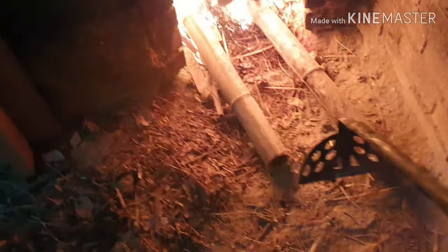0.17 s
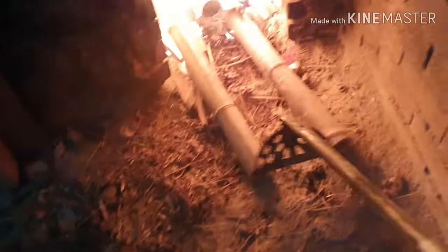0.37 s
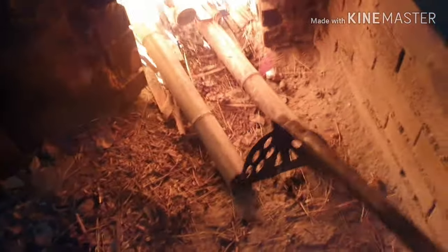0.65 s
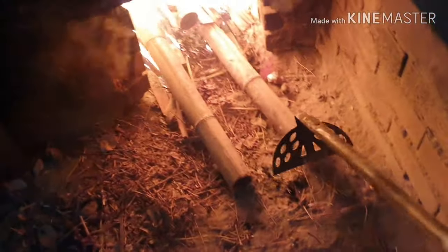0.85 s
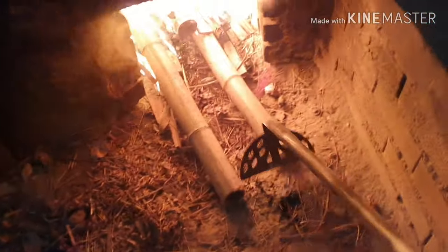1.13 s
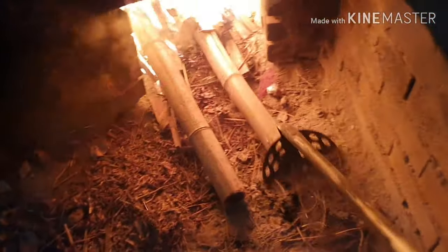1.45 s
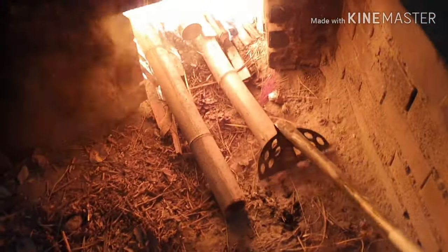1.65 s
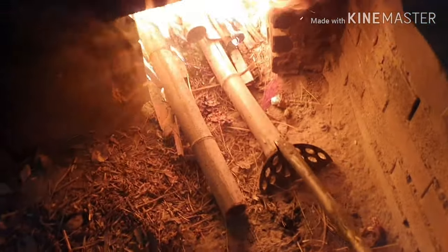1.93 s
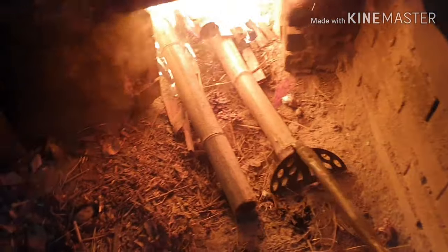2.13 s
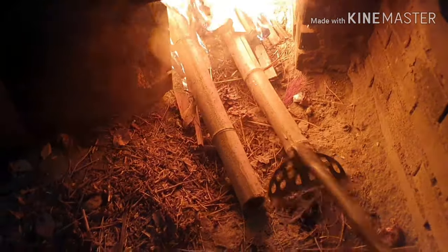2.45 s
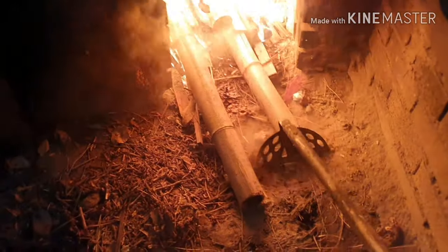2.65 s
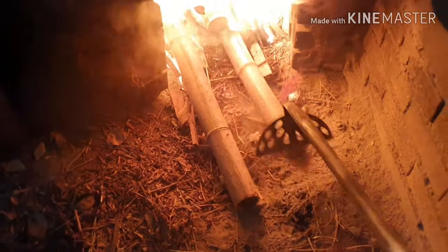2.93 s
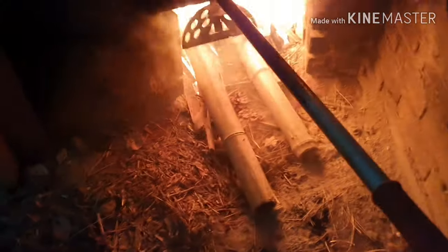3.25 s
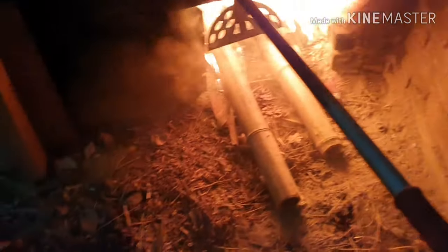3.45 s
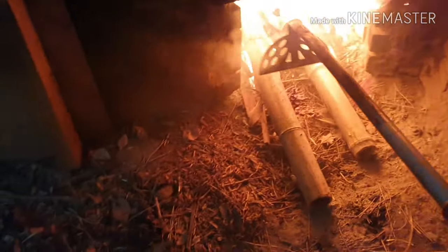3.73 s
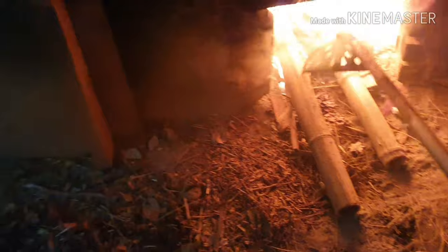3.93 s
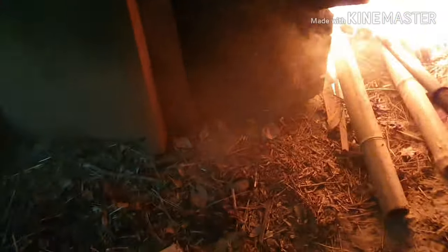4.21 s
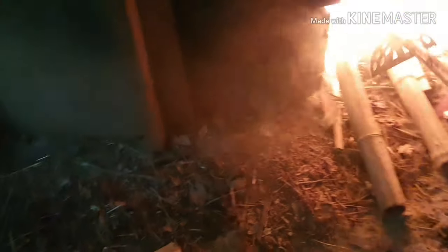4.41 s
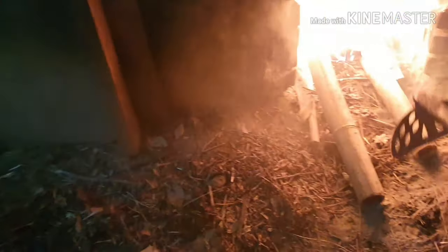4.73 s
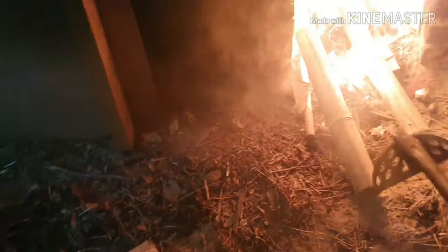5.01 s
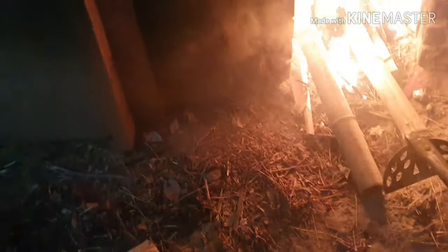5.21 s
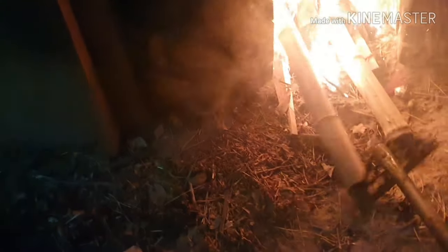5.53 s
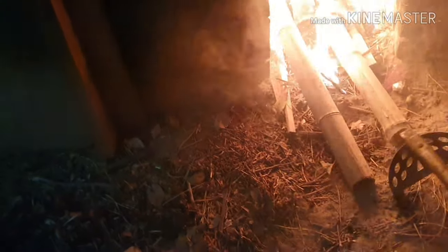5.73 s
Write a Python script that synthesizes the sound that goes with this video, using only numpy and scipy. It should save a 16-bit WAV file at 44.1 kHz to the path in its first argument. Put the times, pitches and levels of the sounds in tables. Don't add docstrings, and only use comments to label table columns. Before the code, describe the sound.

Close to a brick firebox under a roof, a metal rake strikes and shoves hollow bamboo poles in uneven bursts. Woody thuds and hard clacks come with brief bright iron ringing and a short echo. Ash and dry husks rustle and drag after the blows. Between them, faint ticks, light scraping, soft flame rumble and thin steam hiss remain. The loudest clatter comes near the end.

```python
import sys
import numpy as np
from scipy import signal
from scipy.io import wavfile
from scipy.ndimage import uniform_filter1d

SR = 44100
rng = np.random.default_rng(int(sys.argv[2]) if len(sys.argv) > 2 else 0)


def boost(x):
    u = np.asarray(x, float) / 20
    return 10 ** u


def master(y):
    cut = np.clip(np.atleast_2d(y).T, -1, 1)
    pcm = np.round(cut * 32767)
    wavfile.write(sys.argv[1], SR, pcm.astype(np.int16))


N = 258426


def in_time(rows):
    s, *columns = np.transpose(rows)
    return np.array([np.interp(np.arange(N) / SR, s, c) for c in columns])


def at_hz(points, hz):
    points_hz, values = np.transpose(points)
    return np.interp(np.log(hz), np.log(points_hz), values)


def rms_one(x):
    return x / np.sqrt(np.mean(x ** 2) + 1e-20)


def bandpass(x, low_hz, high_hz):
    return signal.sosfilt(signal.butter(2, [low_hz, high_hz], "band", fs=SR, output="sos"), x)


def drift(rate_hz):
    r = np.exp(-2 * np.pi * rate_hz * 40 / SR)
    slow = signal.lfilter([1], [1, -2 * r, r * r], rng.standard_normal(N // 40 + 2002))[2000:]
    return np.interp(np.arange(N) / 40, np.arange(len(slow)), rms_one(slow))


def decay(t, t60):
    return boost(-60 * t / np.maximum(t60, .002))


def bands(white):
    # pitch_hz, correlation
    likeness = [(30, 0.99), (70, 0.99), (180, 0.95), (400, 0.83), (800, 0.15), (1500, -0.1),
                (3000, 0.000095), (15000, -0.092)]
    edges_hz = 22 * 2 ** np.arange(0, 9.8, .5)
    for k, (low_hz, high_hz) in enumerate(zip(edges_hz, edges_hz[1:])):
        mid, side = bandpass(white[k % 2], low_hz, high_hz)
        hz = np.sqrt(low_hz * high_hz)
        alike = np.clip(at_hz(likeness, hz), -1, 1)
        yield hz, np.sqrt(1 + alike) * mid + np.sqrt(1 - alike) * side * [[1], [-1]]


def add(out, s, sound, pan_db):
    i = round(s * SR)
    panned = sound * boost(np.array([[.5], [-.5]]) * pan_db)
    out[:, i:i + sound.shape[-1]] += panned[:, :N - i]


def thuds():
    # start_s, peak_db, pitch_hz, left_minus_right_db
    knocked = [(0.271, -7.5, 523, 2), (0.268, -6.5, 689, 0), (0.324, -15, 740, 7), (0.9, -10.5, 733, 2),
               (0.954, -15.5, 782, 4), (1.004, -23.5, 840, 0), (1.067, -18.5, 497, 1),
               (1.442, -29.5, 794, 25), (1.482, -15, 677, 5), (1.524, -26, 726, 21), (5.534, -1.5, 427, 4),
               (1.812, -35.5, 608, 6), (2.492, -29, 530, 2.5), (2.51, -25.5, 750, 9), (2.537, -10, 658, -5),
               (3.562, -37, 524, -3), (2.988, -10.5, 685, 1), (3.059, -25, 630, 4), (3.265, -30, 656, -2),
               (3.926, -23, 459, -4), (3.966, -27, 430, 3), (4.038, -14, 635, -4), (4.076, -9, 790, -1),
               (4.482, -25, 513, -5), (4.495, -18, 567, -2), (5.552, -15.5, 564, 0), (5.065, -7.5, 460, 3),
               (5.075, -19, 686, 3), (5.655, -19.5, 487, -4), (5.716, -24, 470, 1)]
    # start_s, peak_db, pitch_hz, left_minus_right_db
    dropped = [(0.0055, -35, 54.7, -35), (1.783, -34.5, 438, 3), (4.827, -31.5, 578, 1),
               (5.577, -21, 408, -1), (0.9, -11, 280, 0), (2.515, -20.5, 333, 4), (2.534, -12.5, 261, -3),
               (2.988, -18, 168, 0), (3.019, -12.5, 275, -2), (3.267, -24, 282, 0), (4.039, -17, 200, -1),
               (4.255, -23, 176, 0), (4.288, -23, 292, 18), (4.331, -28, 407, 1), (4.528, -22, 273, -1),
               (4.84, -25, 153, 0), (4.842, -29, 206, 2), (5.079, -4.5, 456.6, -2), (5.501, -20.5, 292, 2),
               (5.539, -11, 346, 0), (5.745, -22, 273, 2), (3.334, -30.5, 149, 2), (4.775, -32, 170, 0),
               (3.72, -33, 180, 0)]
    ring_s, ring_turns = 0.013, 5.58
    drop_rings = 0.82
    out, t = np.zeros((2, N)), np.arange(SR // 5) / SR
    rows = [(*row, 1) for row in knocked] + [(*row, drop_rings) for row in dropped]
    for s, peak_db, hz, pan_db, rings in rows:
        chance = rng.random(3)
        pitches = hz * np.array([[1], [1.055 + 0.2 * chance[0]], [0.618 + 0.15 * chance[1]]])
        lag_s = np.array([[[.0002]], [[0]]]) * (2 * chance[2] - .6)
        modes = np.sin(2 * np.pi * pitches * (t - lag_s)) * boost(np.array([[0], [-8], [-11]]))
        swell = (1 - decay(t, 18 / hz)) ** 2
        fall = decay(t, rings * (ring_s + ring_turns / hz))
        add(out, s - .002, boost(peak_db + 15.0) * modes.sum(1) * swell * fall, pan_db)
    return out


def snap(t, t60, low_hz, high_hz=20000):
    shared, *own = rng.standard_normal((3, len(t)))
    return bandpass(0.57 * shared + np.array(own), low_hz, high_hz) * decay(t, t60)


def click(t, t60, low_hz, high_hz):
    return bandpass((t == 0) * np.sqrt(t60 * SR / 20), low_hz, high_hz)


def clacks():
    # start_s, peak_db, wall_pitch_hz, snap_above_peak_db, left_minus_right_db
    hard = [(0.2903, -12, 1135, -8, -7), (0.3297, -10, 1170, -7.5, -2), (0.9008, -3.5, 1237, -13, -9.5),
            (0.931, -11, 1490, -29, 0), (0.9545, -15.5, 930, -11, 2), (1.4423, -9.5, 1542, -9, 1),
            (1.4555, -11.5, 3250, 2.5, -6), (1.483, -7.5, 1093, -32, 1), (1.525, -15, 1035, -10, 4),
            (2.4895, -18, 1430, -3.5, 0), (2.5138, -4.5, 1435, -9.5, -0.5), (2.521, -16.5, 1940, 2, 3),
            (2.5334, -7.5, 1094, -8.5, 0), (2.9884, -3.5, 1445, -10.5, -4), (3.0193, -9.5, 1050, -6.5, -5),
            (3.0656, -33.5, 994, 8, -13), (3.265, -22.5, 1094, -4.5, -2), (4.0392, -11.5, 2750, 2, -9.5),
            (4.0757, -17, 940, -16, -4), (5.065, -5, 1309, -7.5, -4), (5.513, -22, 2140, 1, -6),
            (5.531, -13.5, 1364, -23, 14.5), (5.5485, -31, 1240, 20, -5), (5.559, -19, 2240, 4.5, -7),
            (0.311, -14.5, 1220, -25, 2), (0.3818, -34, 2960, 5.5, 0), (1.448, -12.5, 2200, -6, -9),
            (1.971, -45.5, 2300, 4.5, -4), (4.481, -41.5, 1500, -27, -17), (4.613, -36.5, 1700, -14, 1),
            (4.795, -44, 1880, -9, 1), (4.8263, -31.5, 1006, -14, -1), (5.5038, -23, 1990, -6, 1),
            (5.5327, -12, 1480, -5, -3), (3.9262, -37.5, 900, -12, -2), (0.903, -15, 1570, -17, 6),
            (5.068, -12.5, 1500, -32, 8), (3.0554, -21, 1900, -5, 1), (3.1, -34, 3000, -11, -3)]
    # start_s, peak_db, wall_pitch_hz, left_minus_right_db
    dull = [(0.2683, -6.5, 1180, 1), (0.3832, -29.5, 1720, -17), (1.253, -39, 2560, 7),
            (1.785, -35.5, 960, 2), (1.817, -33.5, 2070, -7), (1.971, -43, 1270, -1),
            (2.3008, -59, 1890, 3), (2.5687, -19, 890, 19), (3.099, -25, 1900, 4), (3.968, -35, 1010, 6),
            (4.0364, -17, 3440, -5), (4.494, -24, 1620, -2), (3.2645, -25.5, 2130, -11),
            (3.265, -31, 3550, -11), (0.269, -19, 2800, -3), (1.445, -15, 2700, 0), (1.457, -16, 4220, 0),
            (1.459, -17, 2040, 0), (1.477, -21, 3520, 0), (5.532, -18, 3470, 0), (0.3, -24, 2300, 0),
            (0.345, -18, 1700, 0), (0.922, -17, 2300, 0), (0.956, -19.5, 1880, 3), (0.956, -24, 3500, 0),
            (4.83, -32, 1140, 0), (4.041, -17, 2200, 5), (4.041, -15, 1050, 0), (0.902, -21, 3980, 0)]
    tap_snap_db, top_end_db = -28, -9
    notes, bursts, blows = np.zeros((3, 2, N))
    t = np.arange(SR // 10) / SR
    swell = (1 - decay(t, .012)) ** 2
    rows = [*hard, *[(s, peak_db, hz, tap_snap_db, pan_db) for s, peak_db, hz, pan_db in dull]]
    for s, peak_db, hz, hard_db, pan_db in rows:
        snap_db = peak_db + hard_db
        note = np.sin(2 * np.pi * hz * (t - np.array([[.0002], [0]]))) * decay(t, 0.023)
        # level_db, t60_s, low_hz, high_hz
        parts = [(peak_db + 3.5, 0.031, 0.52 * hz, min(1.89 * hz, 4000)),
                 (snap_db + 5.5, 0.021, 3220, 7300),
                 (snap_db + top_end_db + 1.0, 0.03, 9050, 20000)]
        burst = sum(boost(db) * snap(t, *part) for db, *part in parts)
        blow = sum(boost(db) * click(t, *part) for db, *part in parts)
        add(notes, s - .001, boost(peak_db + 4.5) * swell * note, pan_db)
        add(bursts, s - .001, (1 - decay(t, 0.014)) * burst, pan_db)
        add(blows, s, blow, 0)
    return notes, bursts, blows


def rake():
    # start_s, peak_db, mode_favoured_by_the_place_of_the_blow_hz
    strikes = [(1.454, -7.5, 9781), (1.497, -24, 8225), (1.813, -29, 6100), (2.513, -11, 12780),
               (2.989, -17, 10620), (3.021, -16, 10620), (3.8, -38, 9781), (2.493, -12, 11580),
               (5.517, -6.5, 11580), (5.548, -6, 4667), (1.455, -11, 3217), (1.456, -13, 6100),
               (5.53, -15, 7111), (1.545, -25, 10620), (1.442, -8.5, 12000), (1.52, -14, 6100),
               (1.541, -20, 8506), (5.52, -11, 14110), (5.55, -14, 12780), (5.598, -16, 8506),
               (1.765, -30, 8225), (1.766, -31, 7111), (2, -32, 11580), (1.814, -27, 12780),
               (3.06, -24, 8506), (5.549, -14, 14990), (2.118, -46, 10620)]
    # pitch_hz, level_db, t60_s
    iron = [(3217, -20, .1), (4667, -26, .1), (6100, -25, .15), (7111, -26, .15), (8225, -25, .25),
            (8506, -29, .35), (9781, -21, .13), (10620, -27, .28), (11220, -23, .15), (11580, -21, .09),
            (12780, -24, .1), (13800, -26, .12), (14110, -25, .15), (14990, -25, .15)]
    rattle_db, grain_s = 6.5, 0.0019
    steady_t60_s = 0.17
    out, t = np.zeros((2, N)), np.arange(SR // 7) / SR
    choke = np.sqrt(np.hanning(2 * len(t))[len(t):])
    hz, level_db, t60 = np.transpose(iron)[:, :, None]
    rattle_swing_db = rattle_db * np.minimum(steady_t60_s / t60, 1) ** 2
    for s, peak_db, favoured_hz in strikes:
        strength_db = rng.normal(-15, 3, hz.shape)
        strength_db[np.argmin(abs(hz - favoured_hz))] = 4
        phase = rng.uniform(0, 2 * np.pi, (2, *hz.shape))
        chatter = uniform_filter1d(rng.standard_normal((len(hz), len(t))), size=round(grain_s * SR))
        rattle = rattle_swing_db * np.tanh(rms_one(chatter)) * decay(t, 1.5)
        gain = boost(level_db + strength_db + rattle) * decay(t, t60)
        modes = gain * np.sin(2 * np.pi * hz * t + phase)
        add(out, s, boost(peak_db) * modes.sum(1) * choke * (1 - decay(t, 0.0016)), 0)
    return out


def shed(sources):
    # pitch_hz, t60_s
    roof_t60 = [(100, 0.22), (300, 0.22), (700, 0.32), (1500, 0.41), (4000, 0.39), (9000, 0.11),
                (16000, 0.18)]
    t, out = np.arange(SR * 3 // 5) / SR, 0
    for source in sources:
        white = rng.standard_normal((2, 2, len(t)))
        echoes = sum(band * decay(t, at_hz(roof_t60, hz)) for hz, band in bands(white))
        chance = rng.exponential(1, len(t) // 64 + 1).clip(0, 2)
        lumps = boost(2.5 * chance.repeat(64)[:len(t)])
        echoes = rms_one(lumps * echoes * (1 - decay(t, 0.016))) / np.sqrt(len(t))
        out = out + signal.fftconvolve(source.mean(0)[None], echoes, axes=1)[:, :N]
    return out


def litter():
    # start_s, length_s, dry_rustle_db, heavy_drag_db
    slides = [
        (0.281, 0.33, -36.5, -24),
        (0.915, 0.34, -34, -23),
        (1.262, 0.22, -24, -46),
        (1.447, 0.3, -22.5, -20),
        (2.499, 0.32, -34, -29.5),
        (2.997, 0.24, -43, -25.5),
        (3.266, 0.16, -69, -42),
        (4.039, 0.32, -50, -18.5),
        (5.07, 0.22, -66, -28.5),
        (5.585, 0.35, -51, -33.5),
    ]
    # start_s, length_s, dry_rustle_db, heavy_drag_db
    scrapes = [
        (1.708, 0.31, -51, -57),
        (1.934, 0.3, -50, -92),
        (3.557, 0.15, -32, -38),
        (3.912, 0.17, -58, -41),
        (4.232, 0.17, -49, -43),
        (4.448, 0.33, -49, -44),
        (5.498, 0.12, -18.5, -20),
    ]
    t, out = np.arange(N) / SR, 0
    for s, length, *level_db in slides:
        shape_db = np.interp(t - s, [0, 0.039, length / 2, length], [-1, 0, -16, -56], -120, -120)
        out = out + np.outer(boost(level_db), boost(shape_db))
    for s, length, *level_db in scrapes:
        shape_db = np.interp((t - s) / length, [0, 0.24, 0.58, 1], [-22.5, 0, -3, -22.5], -120, -120)
        out = out + np.outer(boost(level_db), boost(shape_db))
    return out


def plate(x):
    share = 0.74
    t, turn = np.arange(SR // 20) / SR, 2.46 * drift(3.8)
    bodies = rng.standard_normal((2, 1, len(t))) * decay(t, 0.033)
    one, other = [signal.oaconvolve(x, body / np.linalg.norm(body), axes=1)[:, :N] for body in bodies]
    return np.sqrt(1 - share) * x + np.sqrt(share) * (np.cos(turn) * one + np.sin(turn) * other)


def sliding(air):
    # pitch_hz, density_db
    rustle_spectrum = [(600, -60), (1500, -10), (3000, 6), (5000, 1), (8000, -0.5), (12000, 5), (16000, -4)]
    drag_spectrum = [(45, -29), (130, -12), (300, -8.5), (650, -4), (1200, -8), (2500, -12.5),
                     (5000, -26.5)]
    rustle_gain, drag_gain = uniform_filter1d(litter(), size=400)
    grain = boost(0.14 * rng.exponential(1, N // 32 + 1).repeat(32)[:N] + 2.0 * drift(57))
    rustle, drag = np.zeros((2, 2, N))
    for hz, band, own in air:
        rustle += band * boost(at_hz(rustle_spectrum, hz) + 0.44 * own)
        drag += band * boost(at_hz(drag_spectrum, hz) + 2.0 * own)
    rustle = plate(boost(-7.0) * rustle_gain * rms_one(grain * rustle))
    return rustle + boost(-4.5) * drag_gain * rms_one(grain * drag)


def whistles():
    # start_s, end_s,
    # pitch_hz, width_hz, level_db
    hisses = [
        (1.82, 2.1, 14300, 1100, -56),
        (2.09, 2.26, 2700, 14, -59),
        (1.13, 1.22, 1270, 70, -59),
        (3.72, 3.84, 1240, 60, -61),
        (4.5, 4.66, 1680, 350, -46),
        (4.51, 4.64, 2850, 260, -52),
        (3.58, 3.7, 1500, 900, -47),
        (4.5, 4.85, 620, 300, -44),
              (1.254, 1.41, 10700, 7100, -46), (2.097, 2.2, 7500, 7000, -61),
             (2.214, 2.27, 4200, 1000, -57.5), (2.313, 2.37, 4700, 2400, -58.5),
             (4.487, 4.7, 13000, 6500, -55), (4.5, 4.68, 4300, 2100, -48.5),
             (5.513, 5.55, 11600, 5500, -27), (5.553, 5.58, 10000, 3000, -25),
             (5.545, 5.6, 4500, 1200, -32), (2.49, 2.51, 12400, 4200, -37), (1.45, 1.5, 3800, 2400, -33),
             (1.5, 1.6, 9400, 6000, -42), (3.585, 3.74, 758, 64, -45.5), (3.558, 3.68, 515, 200, -43.5),
             (3.93, 4.03, 490, 230, -41), (0.64, 0.78, 11400, 8700, -67.5), (1.8, 2.08, 11000, 6700, -59.5),
             (5.075, 5.22, 12000, 7000, -57), (3.1, 3.26, 8700, 6600, -60), (4.34, 4.49, 10000, 9000, -64),
             (5.6, 5.8, 10000, 8000, -57), (4.83, 4.9, 330, 260, -43.5), (3.7, 3.92, 2300, 1600, -60),
             (0.905, 1.06, 760, 170, -29), (5.38, 5.5, 12000, 7000, -62), (1.26, 1.4, 3700, 2600, -42),
             (1.085, 1.145, 480, 130, -38), (2.36, 2.43, 4400, 2000, -61), (3.575, 3.685, 9000, 10000, -48),
             (5.69, 5.78, 480, 160, -38), (4.09, 4.2, 760, 160, -32)]
    out, slips = np.zeros((2, N)), boost(0.83 * drift(21))
    for start, end, hz, width_hz, level_db in hisses:
        noise = rng.standard_normal((2, round((end - start + .04) * SR)))
        narrow = bandpass(noise, hz - width_hz / 2, hz + width_hz / 2)
        fade = np.sin(np.pi * np.sqrt(np.linspace(0, 1, round((end - start) * SR))))
        fade = fade * slips[round(start * SR):][:len(fade)]
        add(out, start, boost(level_db) * fade * rms_one(narrow)[:, -len(fade):], 0)
    return out


def crackles():
    # start_s, peak_db, left_minus_right_db
    ticks = [(0.099, -41.5, -10), (0.1385, -35, -6), (0.609, -49.5, -12), (0.7976, -50, -2),
             (1.2522, -7, -1), (1.732, -32.5, 1), (1.766, -40, -4), (1.8145, -36, 0), (0.571, -53, 0),
             (3.211, -52, 0), (3.247, -48, 0), (2.215, -47, -18), (2.3141, -54, 5), (2.359, -43, 0),
             (2.4478, -46, 3), (2.836, -36, -2), (2.8724, -55, -17), (3.4254, -58.5, 1), (3.4784, -64, -14),
             (3.5184, -59, -9.5), (4.794, -40, -19), (4.828, -31, -3), (4.941, -42, -3),
             (5.3357, -49.5, -28), (5.3494, -32.5, 5), (5.377, -34.5, -6), (4.497, -32, -2),
             (4.608, -44, 0), (4.619, -46, 0), (4.655, -50, 0), (4.677, -48, 0), (2.099, -42, 0),
             (2.3, -63, 0)]
    out, t = np.zeros((2, N)), np.arange(SR // 20) / SR
    for s, peak_db, pan_db in ticks:
        pop = boost(4.5) * snap(t, 0.0046, low_hz=2480)
        fizz = snap(t, 0.024, low_hz=5600)
        body_db = -5.0 - 0.29 * max(peak_db + 23, 0)
        body = boost(body_db) * snap(t, 0.015, low_hz=1400, high_hz=5360)
        add(out, s, boost(peak_db - 11.5) * (pop * boost(-0.5) + fizz + body), pan_db)
    for s, size, side in rng.random((70, 3)):
        add(out, s * N / SR, boost(-68 + 10 * size) * snap(t, .012, low_hz=4000), 12 * (side - .5))
    return out


def fire(air):
    # pitch_hz, density_db
    rumble_spectrum = [(12, -51), (20, -35), (45, -10.5), (75, -5.5), (295, -18), (358, -27.5), (594, -23),
                       (700, -37), (910, -69), (1540, -120)]
    hiss_spectrum = [(1500, -26), (3000, -17), (4400, -6), (6500, -18)]
    broad_spectrum = [(500, -6), (1000, 16.5), (2000, 13), (4000, 0), (8000, -25.5), (11000, 24.5),
                      (14500, -9), (16500, -6)]
    # time_s, level_db
    flame = [(0, -54), (0.5, -53.5), (1.1, -48.5), (1.5, -55), (2.3, -53.5), (3.25, -51), (3.6, -53),
             (4.25, -48), (5.0, -49), (5.45, -48.5), (5.7, -43.5), (5.86, -53)]
    # time_s, level_db
    steam = [(0, -65), (0.7, -73.5), (0.89, -60), (0.96, -49.5), (1.57, -56), (1.75, -54.5), (2.34, -64.5),
             (2.47, -73), (2.66, -50.5), (3.21, -56), (3.79, -50.5), (4.0, -54), (4.26, -53.5), (4.62, -52),
             (5.02, -64.5), (5.4, -58.5), (5.68, -59), (5.86, -55.5)]
    rumble_db, hiss_db = in_time(flame)[0], in_time(steam)[0]
    broad_db = -65 + 0.33 * (hiss_db + 60)
    flicker = drift(30.0)
    rumble, hiss, broad = np.zeros((3, 2, N))
    for hz, band, own in air:
        rumble += band * boost(at_hz([*rumble_spectrum, (3500, -120)], hz) + 2.0 * flicker + 1.5 * own)
        hiss += band * boost(at_hz([(300, -70), *hiss_spectrum, (14000, -80)], hz) + 2.2 * own)
        broad += band * boost(at_hz([(150, -20), *broad_spectrum], hz) + 1.8 * own)
    jet = bandpass(rng.standard_normal((2, N)), 3800, 5200)
    hiss = rms_one(hiss) + 1.1 * rms_one(jet * boost(2.5 * drift(9)))
    hissing = boost(hiss_db - 3.5) * rms_one(hiss) + boost(broad_db + 5.0) * rms_one(broad)
    return hissing + boost(rumble_db + 2.0) * rms_one(rumble)


def scene():
    # time_s, level_db
    under_roof = [(0, -5.5), (0.6, 0.5), (1.1, 1), (1.35, 0), (1.7, 1), (2.3, 0.5), (2.8, 0), (3.15, -1),
                  (3.4, -2.5), (3.9, 2), (4.3, -1), (4.5, -5), (4.83, -1.5), (5.0, -1), (5.4, -1),
                  (5.86, -0.5)]
    hollow, (notes, bursts, blows), iron, ticks = thuds(), clacks(), rake(), crackles()
    sent = boost(in_time(under_roof))
    dull = sent * (boost(-2.0) * hollow + boost(-9.0) * notes)
    bright = sent * (boost(-2.5) * blows + boost(2.5) * ticks + iron)
    echoes = shed([dull, bright]) * boost(0.7 * drift(45) - 1.0)
    high_pass = signal.butter(2, 55, "high", fs=SR, output="sos")
    knocks = signal.sosfilt(high_pass, hollow + notes + echoes)
    air = [(hz, band, drift(22.0)) for hz, band in bands(rng.standard_normal((2, 2, N)))]
    return knocks + bursts + ticks + iron + whistles() + sliding(air) + fire(air)


def band_limit(x):
    return signal.sosfilt(signal.butter(12, 16100, fs=SR, output="sos"), x)


def record(dry):
    ports = dry * boost(np.array([[-.4], [.4]]))
    rounded = 1.137 * np.tanh(ports / 0.91)
    finished = signal.sosfilt(signal.cheby2(16, 40, 15750, fs=SR, output="sos"), rounded)
    return band_limit(finished)


dry = scene()
out = record(dry)
master(out)
```